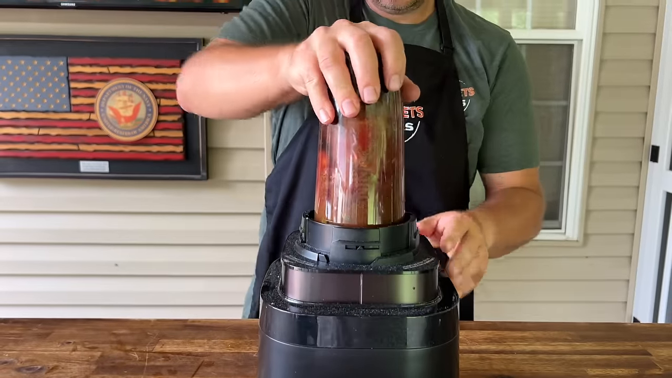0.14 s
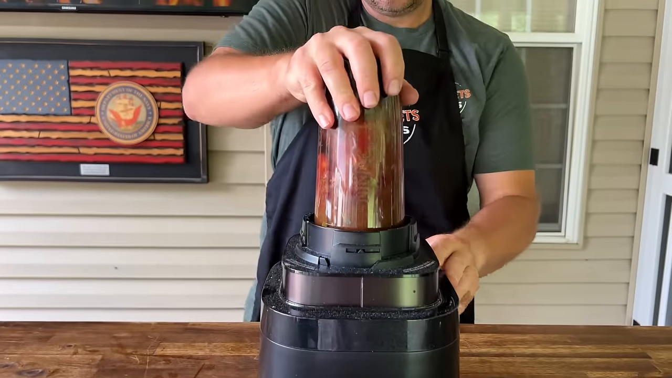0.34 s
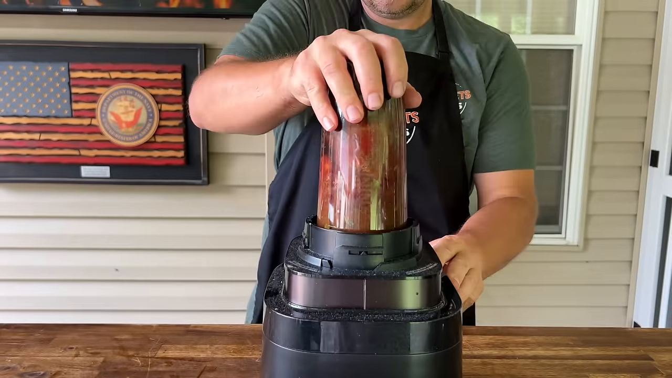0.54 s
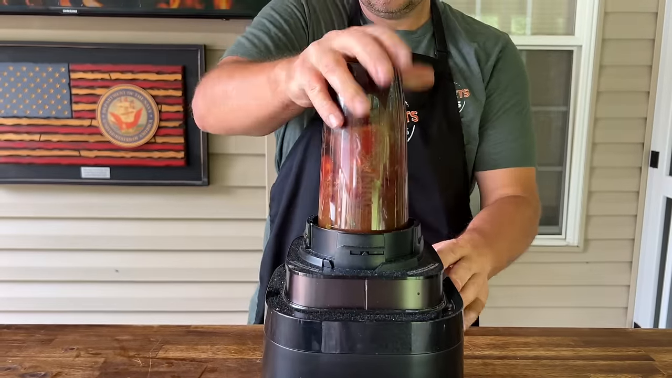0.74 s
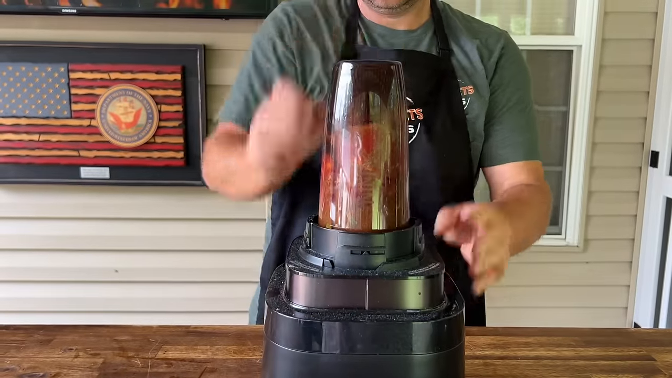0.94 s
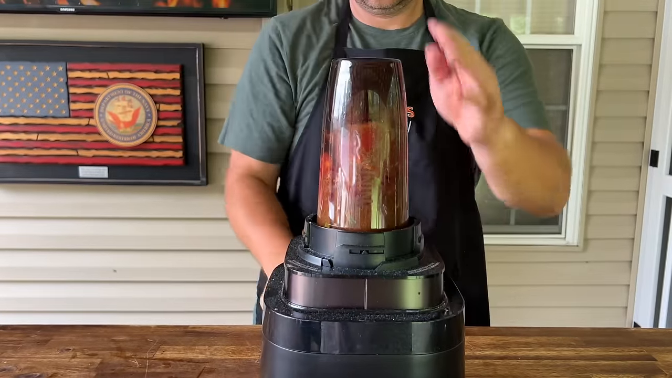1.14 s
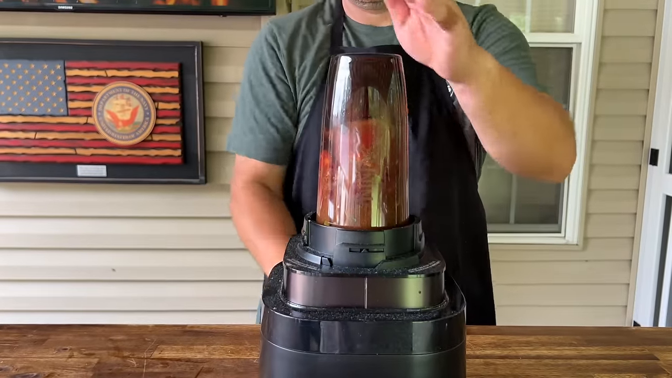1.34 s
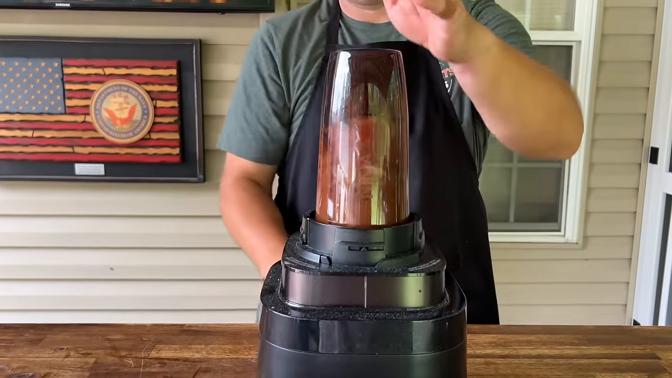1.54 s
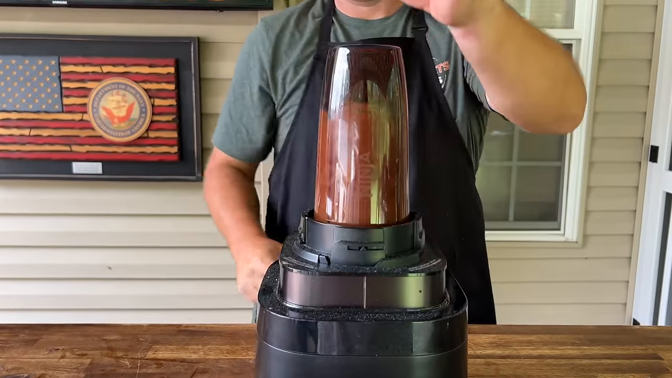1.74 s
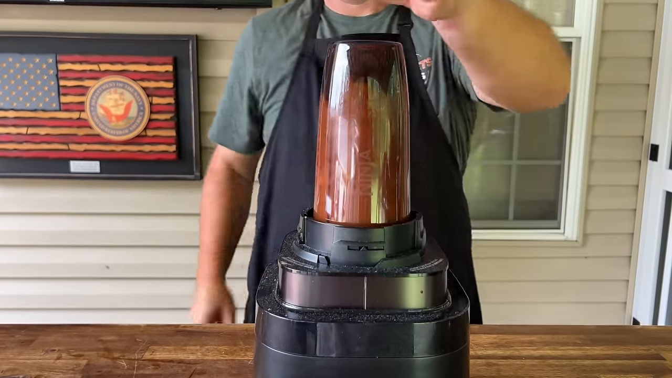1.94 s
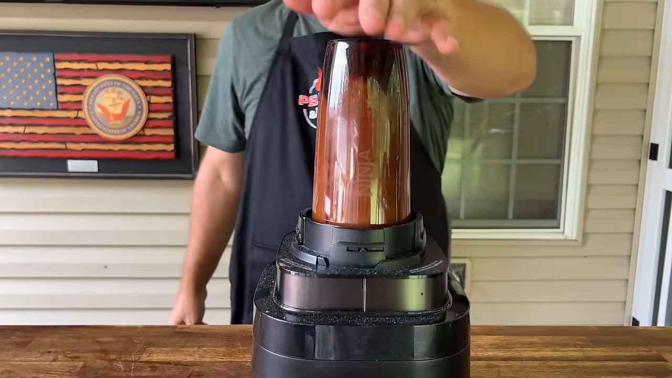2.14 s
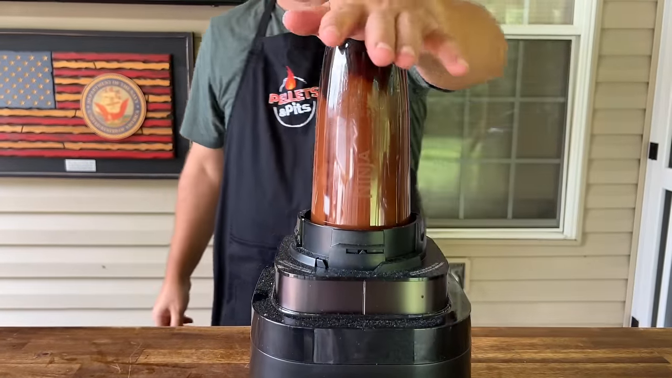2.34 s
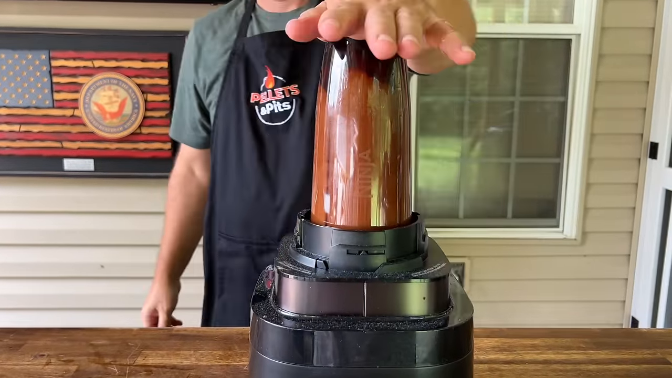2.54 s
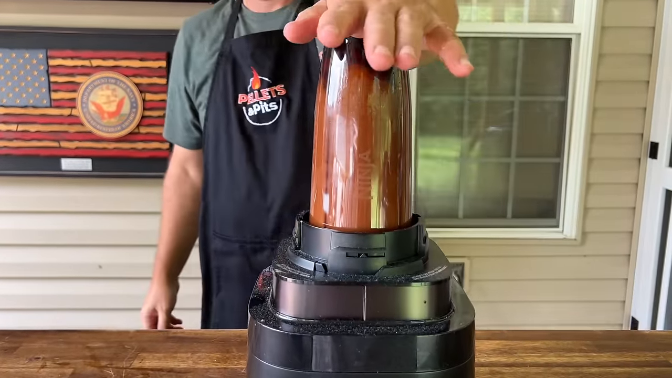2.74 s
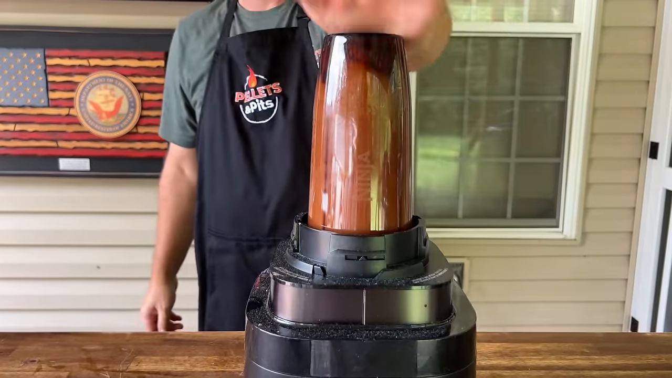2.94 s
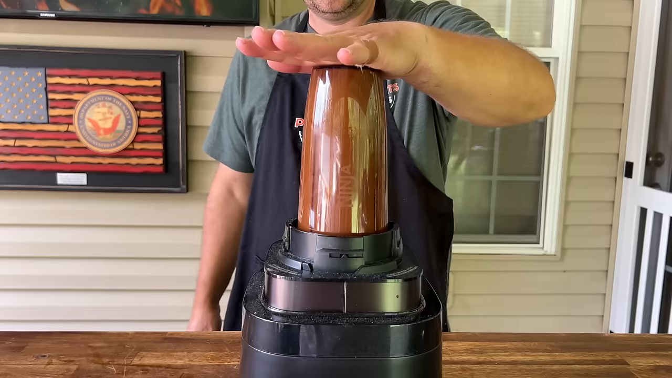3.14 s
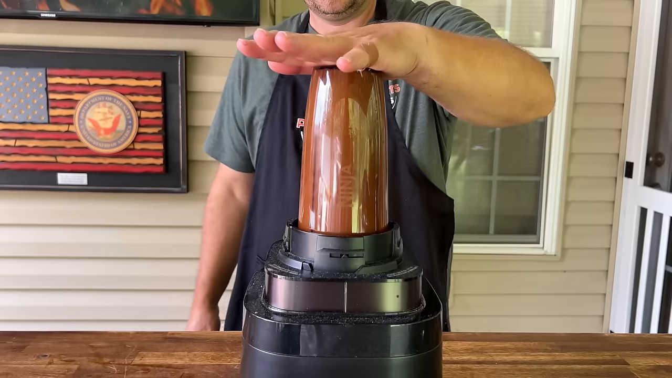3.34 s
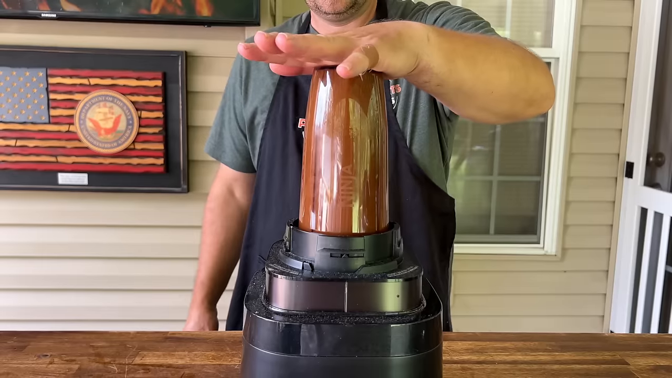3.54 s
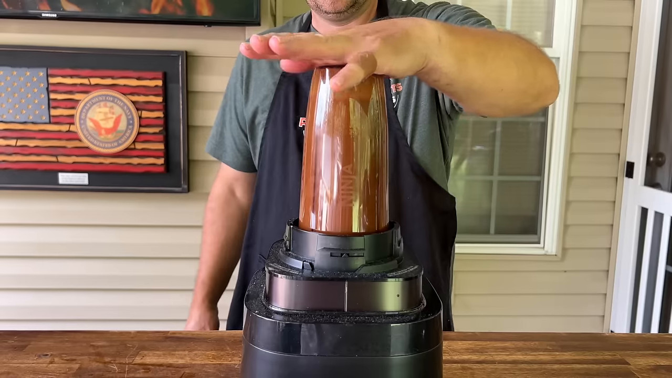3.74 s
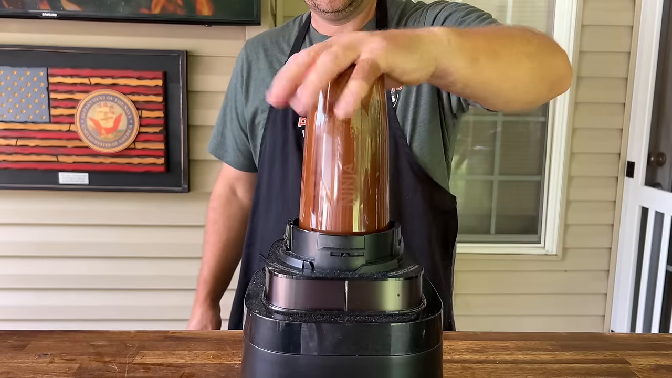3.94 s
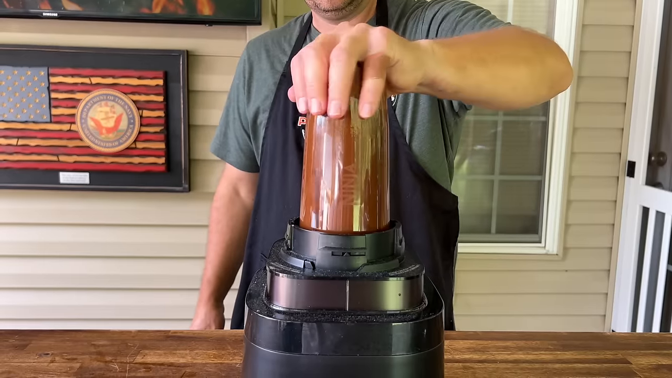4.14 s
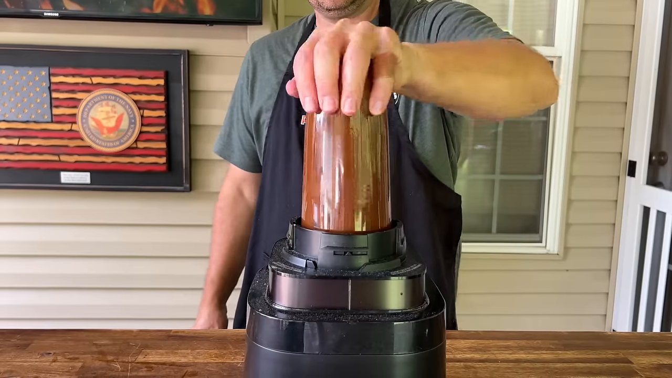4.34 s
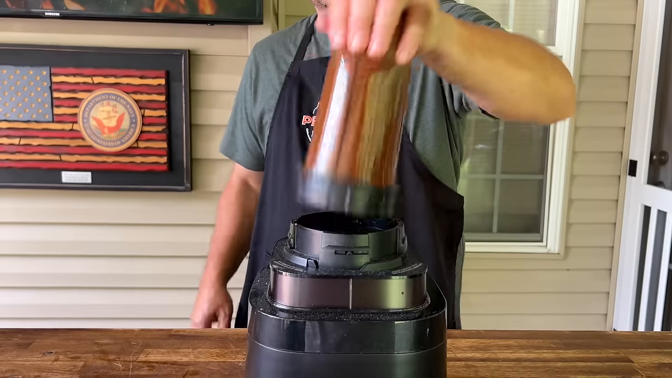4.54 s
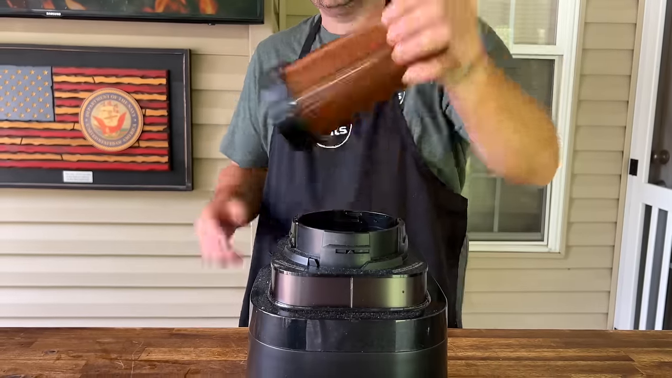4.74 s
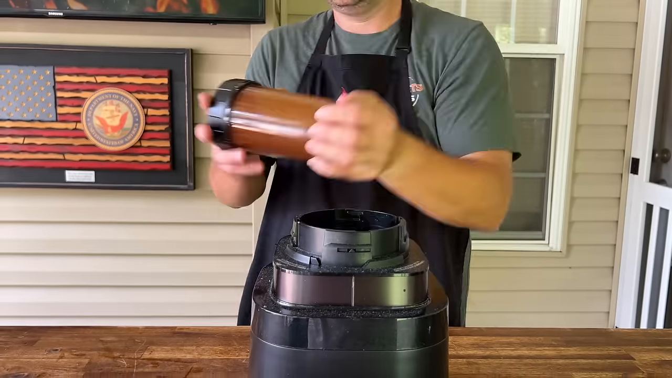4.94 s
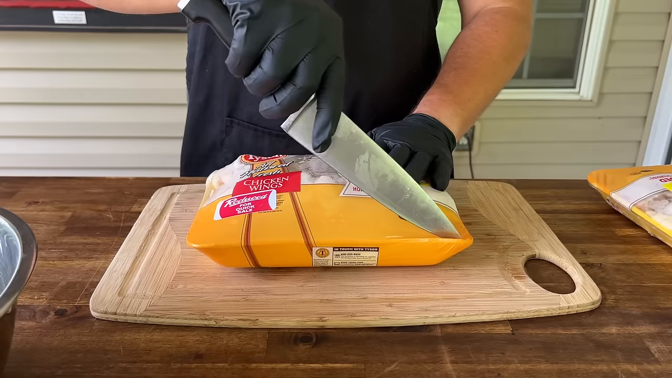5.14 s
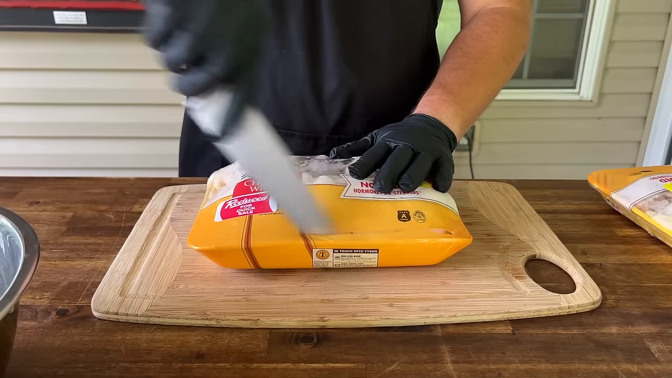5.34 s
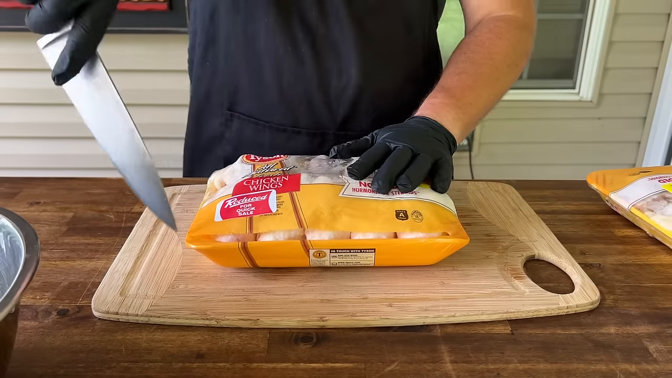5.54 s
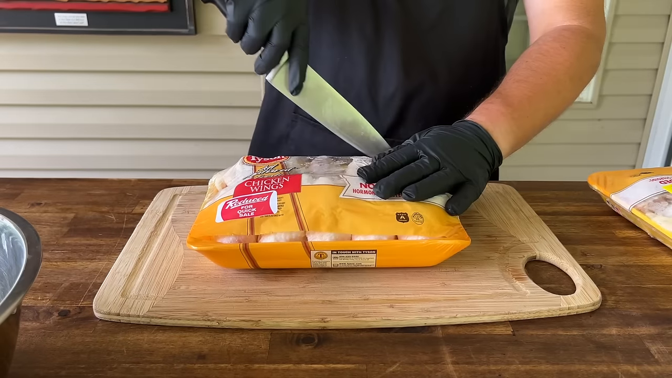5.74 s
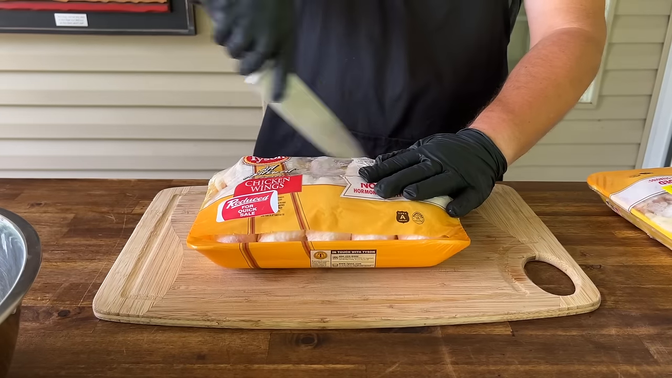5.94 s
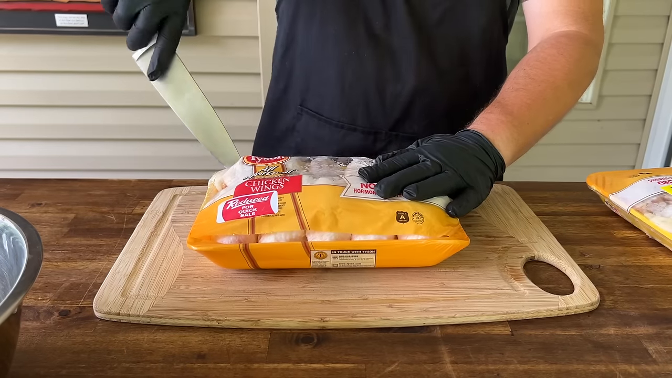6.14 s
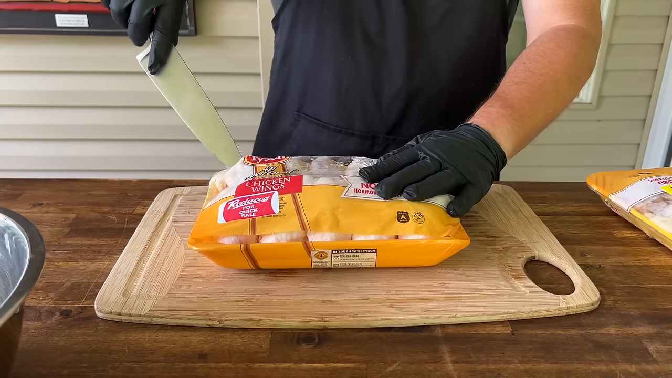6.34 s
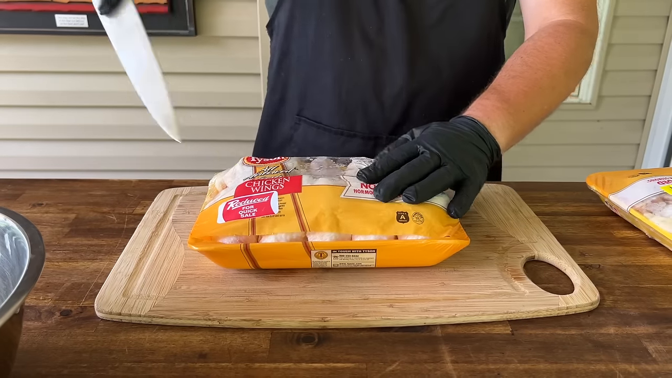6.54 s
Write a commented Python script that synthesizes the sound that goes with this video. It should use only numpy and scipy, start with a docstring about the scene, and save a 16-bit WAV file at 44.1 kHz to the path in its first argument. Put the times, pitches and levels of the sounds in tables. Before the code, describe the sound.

On a breezy porch, a blender whirs briefly, its cup clacks free, and a knife punctures and slits plastic wrap.

```python
"""On a breezy porch, a blender cup is locked onto its base, each impact exciting damped modes.
The motor labours in thick sauce, winds up, hums through rotating imbalance, cuts out and coasts;
shaft speed governs its whirr, rattle and churning. The cup is twisted free, then a knife punctures
and slits the film of a meat tray, releasing its tension in snaps and rips. The porch returns a short
echo, wind buffets the microphone and insects hiss far off."""
import sys
import numpy as np
from scipy import signal
from scipy.fft import rfft, irfft
from scipy.io import wavfile
from scipy.ndimage import uniform_filter1d

SR = 44100
rng = np.random.default_rng(int(sys.argv[2]) if len(sys.argv) > 2 else 0)


def put_to_file(sound):
    """Save the sound as 16-bit audio at rate SR, in the file named by the first command-line argument."""
    columns = np.atleast_2d(sound).T  # one column per channel
    safe = np.clip(columns, -1, 1)
    whole_steps = np.round(safe * 32767)
    wavfile.write(sys.argv[1], SR, whole_steps.astype(np.int16))


N = 291060
T = np.arange(N) / SR
# power on, sauce breaks loose, lumps are chopped, top speed, power off
ON_S, LOOSE_S, SMOOTH_S, TOP_S, OFF_S = 1.375, 1.6, 2.34, 2.56, 3.075
LABOUR_HZ, FULL_HZ, KICK_S = 65.9, 200.5, .03  # shaft rate in packed sauce, top rate, start-up time

# churning sauce: frequency_hz, gain_db
CHURN_SPECTRUM = [(60, -20.5), (140, -8.5), (240, -8), (450, 1.5), (700, 0), (1400, -7), (2200, -4.5),
                  (2750, -6), (3700, -4), (4900, -10.5), (6000, -15.5), (8500, -21.5), (10000, -32),
                  (15500, -54)]
# resonances of the filled cup: centre_hz, width_hz, gain_db
CUP_RESONANCES = [(238, 40, 7.5), (585, 25, -5.5), (623, 28, 5), (800, 58, 4), (1064, 25, 6.5),
                  (1246, 94, 7), (1410, 100, 5.5), (1778, 240, 6.5), (2070, 210, 4), (2360, 79, 4.5),
                  (3200, 200, 1), (4160, 200, 4), (8300, 880, 4.5)]
# cavitation, lumpy swirl and smooth swirl: frequency_hz, gain_db
FIZZ_SPECTRUM = [(3000, -19), (6500, .5), (10000, -2.5), (15500, -4.5)]
LUMPY_SPECTRUM = [(60, -12), (230, 2.5), (450, -5.5), (800, -6.5), (1500, -23.5), (5000, -38.5)]
SMOOTH_SPECTRUM = [(60, -33), (230, 4), (450, -10.5), (1200, -3.5), (2000, -18), (5000, -56)]
# cup resonances under swirling sauce: centre_hz, width_hz, gain_db
LUMPY_RESONANCES = [(255, 90, 5.6), (700, 230, 7.8)]
SMOOTH_RESONANCES = [(645, 90, 9.4), (1145, 220, 9.4)]
# hum of the unbalanced blade, one row per shaft order: start_s, fade_start_s, full_speed_level_db
HUM_ORDERS = [(2.2, 2.85, -16.3), (2.41, 3.06, -21.5), (2.42, 2.88, -22.3)]
# rotor and bearings: frequency_hz, gain_db
WHIRR_SPECTRUM = [(100, -24.5), (230, 1), (450, -7.5), (800, 1), (1400, -5), (2200, -5), (2750, -10.5),
                  (3700, -12), (4800, -14), (6000, -23), (8500, -29.5), (10000, -36), (15500, -42)]
# resonances of the motor housing: centre_hz, width_hz, gain_db
HOUSING_RESONANCES = [(1810, 130, 4), (2100, 73, 3), (3160, 110, 6), (3384, 181.5, 7.5), (3950, 80, 3),
                      (4400, 118, 4.5), (4690, 260, 9), (5440, 120, 7), (7860, 280, 9), (8760, 490, 5)]
# loose drive coupling: frequency_hz, gain_db
RATTLE_SPECTRUM = [(200, -6.5), (1200, 1), (2000, 2.5), (2700, -1.5), (3600, 7), (4800, -8.5),
                   (6000, -14.5), (8700, -25), (11000, -29)]
# sauce lumps strike the blade: start_s, level_db
LUMP_STRIKES = [(1.416, -29), (1.460, -27), (1.817, -16.5)]
# brush friction: frequency_hz, gain_db
BRUSH_SPECTRUM = [(1500, -16), (3300, 3.5), (5000, -6), (6500, -10.5), (9000, -17.5), (11000, -44.5)]
# housing resonances excited by the brushes: centre_hz, width_hz, gain_db
BRUSH_RESONANCES = [(3450, 220, 17), (4800, 200, 12), (8800, 340, 14)]

# impacts of cup, latch and switch: start_s, clack_db, body_db, tick_db
IMPACTS = [(.006, -21.5, -19, -18), (.057, -11, -6, -8), (.398, -34, -44, -50), (.598, -37.5, -44, -62),
           (1.21, -26.5, -21, -45), (1.317, -33, -23.5, -65), (1.373, -35, -35, -41), (4.08, -44, -43, -53),
           (4.11, -14, -24.5, -9.5), (4.124, -24, -22, -20), (4.171, -22, -18, -39),
           (4.186, -33, -25.5, -53), (4.417, -45.5, -33, -61), (4.445, -42, -42, -46),
           (4.465, -39, -39, -39)]
# modes of the base and cup: pitch_hz, level_db, t60_s
BODY_MODES = [(239, 1, 0.07), (295, -0.5, 0.042), (353, 2, 0.054), (480, -4, .05), (551, -8.5, 0.11),
              (640, -9, 0.07), (782, -7.5, 0.044), (1039, -16, 0.061), (1630, -22, 0.086)]
# hollow clack of plastic: frequency_hz, gain_db
CLACK_SPECTRUM = [(150, 8.5), (500, 4), (1600, 0.5), (3300, -2.5), (5000, -12.5), (9000, -48), (16000, -62)]
# bright contact tick: frequency_hz, gain_db
TICK_SPECTRUM = [(1000, -22), (3000, -12), (4500, -7), (8500, -9.5), (11000, -16), (16000, -15)]
# resonances of struck plastic: centre_hz, width_hz, gain_db
CLACK_RESONANCES = [(1510, 690, 5), (2780, 500, 1)]
TICK_RESONANCES = [(4660, 900, 4), (11700, 2000, 2.6)]

# the film snaps under the knife: start_s, level_db, pitch_hz, t60_s
FILM_SNAPS = [(5.228, -2, 4400, 0.013), (5.239, -12, 4000, 0.013), (5.316, -18, 4500, 0.0068),
              (5.887, -10.5, 2550, 0.014), (5.891, -10.5, 2800, 0.012), (5.9, -37, 6900, 0.032),
              (6.044, -26, 8000, .008), (6.150, -39, 6000, 0.014), (6.215, -13, 4340, 0.0096)]
# the knife tears through the film: start_s, end_s, level_db
FILM_TEARS = [(5.203, 5.224, -42.5), (5.234, 5.409, -34), (5.247, 5.258, -22.5), (5.299, 5.312, -24),
              (5.332, 5.347, -24.5), (5.346, 5.367, -20), (5.394, 5.399, -24), (5.406, 5.482, -42),
              (5.897, 5.915, -25)]
# the knife slides along the film: start_s, end_s, level_db
KNIFE_STROKES = [(5.888, 6.03, -26.5), (6.32, 6.37, -42.5)]
# snapping, tearing and slitting film: frequency_hz, gain_db
SNAP_SPECTRUM = [(200, -.5), (700, 2), (1100, -4.5), (1700, 2.5), (2800, .5), (5000, -5), (16000, 0)]
TEAR_SPECTRUM = [(150, -7.5), (250, -6.5), (318, -6), (372, -2), (624, -10), (867, -7), (1380, -4.5),
                 (1820, -1), (1990, -3), (3960, -3), (15500, -15.5)]
SLIT_SPECTRUM = [(300, -23), (800, -13.5), (1250, -8), (1650, -0.5), (3000, -3.5), (4000, 0.5), (5500, -5),
                 (7000, -7), (10000, -8), (15500, -11)]

# long and short parts of the porch echo: frequency_hz, gain_db
LONG_ECHO_SPECTRUM = [(100, -1), (600, -5), (4000, .5), (8000, -5), (14000, -20.5)]
SHORT_ECHO_SPECTRUM = [(2000, -16), (7000, -1), (16000, 1.5)]
# gusts strike the microphone: start_s, end_s, level_db
WIND_GUSTS = [(.43, .63, -23), (.94, 1.33, -20), (1.58, 1.66, -21.5), (1.83, 1.98, -23.5),
              (2.33, 2.66, -28.5), (2.92, 3.08, -26), (3.65, 3.93, -36), (4.52, 4.78, -30.5),
              (5.56, 5.73, -24.5), (6.12, 6.6, -35.5)]
# deep rumble and buffeting of the wind: frequency_hz, gain_db
RUMBLE_SPECTRUM = [(1, -31), (5, 1.5), (9, 1), (14, 9), (25, -4), (40, -18.5), (70, -25.5), (120, -48),
                   (400, -103)]
BUFFET_SPECTRUM = [(10, -19), (30, 11), (45, -0.5), (70, -1), (120, -16.5), (200, -25.5), (400, -55),
                   (1000, -86.5)]
# dull pops in the rumble: start_s, level_db
RUMBLE_POPS = [(5.0132, -25), (5.781, -13.5)]
# garden air and distant insects: frequency_hz, gain_db
AIR_SPECTRUM = [(100, 4.5), (250, 1), (420, 2), (550, -4), (800, -2.5), (1100, -10.5), (2000, -15),
                (3000, -17.5), (7000, -28), (10000, -32.5), (15500, -36)]
INSECT_SPECTRUM = [(2800, -21), (4000, 1.5), (4700, 0), (5400, 1.5), (6500, -9.5), (7600, -2),
                   (8600, -14.5), (10000, -43.5)]
# nearer insects join in: start_s, end_s, level_db
INSECT_SWELLS = [(.55, 1.05, -64), (4.45, 5.1, -75)]


def blender(cut_s=.0014, smoothing_s=.15):
    """Rotating machinery: one shaft paces every source, under a load that falls as lumps are chopped."""
    speed_hz = shaft()
    pace = speed_hz / FULL_HZ
    turns = np.cumsum(speed_hz) / SR
    power = held(ON_S, OFF_S, KICK_S, cut_s)
    lumps = 1 / (1 + np.exp((T - SMOOTH_S) / smoothing_s))
    return (brushes(pace, turns, power) + sauce(pace, turns, power) + swirl(pace, lumps, power)
            + hum(pace, turns) + motor(pace, turns, lumps))


def shaft(windup_exponent=1.42, sag_hz_per_s=11, drag_s=.68, friction_hz=73.7):
    """Rotation rate rises as the load yields; unpowered, viscous drag and dry friction stop it."""
    shortfall = (1 - ramp(LOOSE_S, TOP_S - LOOSE_S)) ** windup_exponent
    sag_hz = sag_hz_per_s * (np.clip(T, TOP_S, OFF_S) - TOP_S)
    driven_hz = (FULL_HZ - (FULL_HZ - LABOUR_HZ) * shortfall - sag_hz) * ramp(ON_S, KICK_S)
    drag = np.exp(-np.maximum(T - OFF_S, 0) / drag_s)
    speed_hz = np.maximum((driven_hz + friction_hz) * drag - friction_hz, 0)
    return speed_hz * (1 + .002 * wander(25))


def sauce(pace, turns, power, churn_db=-12.5, aeration_db_per_s=2, wake_db=-13, fizz_db=-20):
    """Blade passage modulates the churning and leaves a periodic wake; cavitation adds fizz at speed."""
    blade_passage = 1 + .25 * np.cos(2 * np.pi * 2 * turns)  # two tips
    level = amp(churn_db + aeration_db_per_s * (T - TOP_S) + .46 * wander(21))
    stir = level * pace ** 2.18 * ramp(LOOSE_S, .15) * power * blade_passage
    wake = unit(sum(amp(3 * wander(9)) / order * np.sin(2 * np.pi * (order * turns + rng.random()))
                    for order in range(4, 14)))
    slapping = noise() + amp(-9) * grains(500, 3.43)
    churn = colour(stir * slapping, CHURN_SPECTRUM, CUP_RESONANCES)
    fizz = colour(stir * noise() * pace ** 2.2, FIZZ_SPECTRUM)
    return churn + amp(wake_db) * stir * wake + amp(fizz_db) * fizz


def hum(pace, turns, speed_exponent=5.2, waver_db=.4):
    """Rotating imbalance forces the base at the first shaft orders, easing as the sauce evens out."""
    vibration = np.zeros(N)
    for order, (start, end, db) in enumerate(HUM_ORDERS, 1):
        level = amp(db + waver_db * wander(9.9)) * held(start, end, attack_s=.049, release_s=.2)
        vibration += level * np.sqrt(2) * np.sin(2 * np.pi * order * turns)
    return vibration * pace ** speed_exponent * held(ON_S, OFF_S, KICK_S, release_s=.009)


def motor(pace, turns, lumps, whirr_db=-24, load_db=4.5, rattle_db=-30, scatter_db=2.5):
    """Bearing noise and one knock of the loose coupling per turn excite the housing's resonances."""
    pulsing = 1 + .15 * np.cos(2 * np.pi * turns)
    whirr = amp(whirr_db + load_db * lumps) * pace ** 1.81 * noise() * pulsing
    turn_starts = np.flatnonzero(np.diff(np.floor(turns)))
    strength, lateness = rng.standard_normal((len(turn_starts), 2)).T
    knock_s = T[turn_starts] + .1 * lateness / (FULL_HZ * pace[turn_starts])
    knock_db = rattle_db + scatter_db * strength + 20 * np.log10(pace[turn_starts])
    knocks = np.zeros(N)
    for start, db in [*LUMP_STRIKES, *zip(knock_s, knock_db)]:
        add(knocks, start, amp(db) * burst(t60_s=.021, size=2048))
    rattle = colour(knocks, RATTLE_SPECTRUM, HOUSING_RESONANCES)
    return colour(whirr, WHIRR_SPECTRUM, HOUSING_RESONANCES) + rattle


def brushes(pace, turns, power, rub_db=-27, onset_pace=.62, onset_width=.019):
    """Above a threshold speed, brush friction on the commutator excites narrow housing resonances."""
    grip = power / (1 + np.exp((onset_pace - pace) / onset_width))
    chatter = 1 + .83 * np.cos(2 * np.pi * turns)
    rub = grip * chatter * noise() * amp(rub_db + 1.5 * wander(40))
    return colour(rub, BRUSH_SPECTRUM, BRUSH_RESONANCES)


def swirl(pace, lumps, power, driven_db=-36, lumps_db=14, coast_db=-35, settle_pace=.38):
    """Unsteady flow excites the cup: lumpy sauce gurgles low, smooth coasting sauce rings higher."""
    flow = unit(noise() + grains(300, 1.9)) * amp(2.3 * wander(27))
    driven = amp(driven_db + lumps_db * lumps) * pace ** 1.11 * power
    coasting = amp(coast_db) * np.tanh(pace / settle_pace) ** 2 * (T >= OFF_S)
    gurgle = colour(flow * driven, LUMPY_SPECTRUM, LUMPY_RESONANCES)
    return gurgle + colour(flow * coasting, SMOOTH_SPECTRUM, SMOOTH_RESONANCES)


def plastic_impacts(clack_rise_s=.0016, body_rise_s=.0056):
    """Impact excitation: a contact tick, a hollow clack, then the damped modes of the heavy base."""
    clack, tick, body = np.zeros((3, N))
    t = T[:SR // 2]
    clack_rise = 1 - np.exp(-t / clack_rise_s)
    body_rise = 1 - np.exp(-(t / body_rise_s) ** 2)
    for start, clack_db, body_db, tick_db in IMPACTS:
        add(clack, start, amp(clack_db) * burst(t60_s=.042) * clack_rise)
        add(tick, start, amp(tick_db) * burst(t60_s=.018))
        for hz, db, t60_s in BODY_MODES:
            detune = 1 + .008 * rng.standard_normal()
            mode = np.sin(2 * np.pi * (hz * detune * t + rng.random()))
            add(body, start, amp(body_db + db) * body_rise * decay(t60_s) * mode)
    clack = colour(clack, CLACK_SPECTRUM, CLACK_RESONANCES)
    return clack + colour(tick, TICK_SPECTRUM, TICK_RESONANCES) + body


def knife(ring_q=2.66):
    """Sudden release of tension makes the film snap and rip; friction along the edge makes it hiss."""
    snaps = np.zeros(N)
    for start, db, hz, t60_s in FILM_SNAPS:
        crack = burst(t60_s)
        ring = signal.lfilter(*signal.iirpeak(hz, ring_q, fs=SR), crack)
        add(snaps, start, amp(db) * (.397 * crack + 2.506 * ring))
    pull = sum(amp(db) * (T > start) * (T < end) for start, end, db in FILM_TEARS)
    rips = uniform_filter1d(pull, size=130) * unit(noise() + grains(2500, 2.6))
    strokes = swells(KNIFE_STROKES, attack_s=.075, release_s=.016)
    hiss = strokes * unit(noise() + grains(2500, 2.4)) * amp(1.5 * wander(83))
    return colour(snaps, SNAP_SPECTRUM) + colour(rips, TEAR_SPECTRUM) + colour(hiss, SLIT_SPECTRUM)


def porch(direct, wet_db=-14, delay_s=.006):
    """Reflections from siding, floor and roof form a short reverberation whose treble dies first."""
    long_tail, short_tail = np.zeros((2, N))
    add(long_tail, delay_s, burst(t60_s=.22))
    add(short_tail, delay_s, burst(t60_s=.18))
    echo = colour(long_tail, LONG_ECHO_SPECTRUM) + 1.3 * colour(short_tail, SHORT_ECHO_SPECTRUM)
    echo = echo[:SR // 2]
    return direct + amp(wet_db) * signal.fftconvolve(direct, echo / np.linalg.norm(echo))[:N]


def wind(breeze_db=-42, rumble_db=-22, flutter_db=2.5):
    """Turbulent pressure buffets the microphone; a deep rumble grows as the square root of its force."""
    gusts = swells(WIND_GUSTS, attack_s=.056, release_s=.09)
    force = (amp(breeze_db) + gusts) * amp(flutter_db * wander(9))
    rumble = unit(colour(noise(), RUMBLE_SPECTRUM)) * amp(rumble_db) * np.sqrt(force / amp(breeze_db))
    return rumble + unit(colour(noise(), BUFFET_SPECTRUM)) * force


def pops():
    """A decaying step has mostly low-frequency energy, so a jump in the rumble is heard as a dull pop."""
    steps = np.zeros(N)
    for start, db in RUMBLE_POPS:
        add(steps, start, amp(db) * decay(t60_s=.09))
    return steps


def garden(air_db=-51, chorus_db=-65.5, chirp_db=-59, chirp_hz=2050):
    """Incoherent insect calls merge into a high hiss over soft air noise and one faint tonal chirp."""
    air = colour(noise(), AIR_SPECTRUM) * amp(air_db + .84 * wander(3.3))
    chorus = amp(chorus_db) + swells(INSECT_SWELLS, attack_s=.23, release_s=.2)
    insects = colour(noise(), INSECT_SPECTRUM) * chorus * amp(1.1 * wander(30))
    chirp = held(.82, .854, attack_s=.03, release_s=.02) * np.sin(2 * np.pi * chirp_hz * T)
    return air + insects + amp(chirp_db) * chirp


def amp(db):
    """Amplitude ratio of a level in decibels."""
    return 10 ** (np.asarray(db) / 20)


def ramp(start_s, rise_s):
    """Linear rise from 0 to a steady 1."""
    return np.clip((T - start_s) / rise_s, 0, 1)


def held(start_s, end_s, attack_s, release_s):
    """Envelope with linear attack, hold and exponential release."""
    return ramp(start_s, attack_s) * np.exp(-np.maximum(T - end_s, 0) / release_s)


def swells(rows, attack_s, release_s):
    """Superposition of held envelopes."""
    return sum(amp(db) * held(start, end, attack_s, release_s) for start, end, db in rows)


def unit(x):
    """Normalisation to rms 1."""
    return x / np.sqrt(np.mean(x ** 2))


def noise():
    """Gaussian white noise."""
    return rng.standard_normal(N)


def wander(cutoff_hz):
    """Low-pass noise: a smooth fluctuation of rms 1."""
    return unit(signal.sosfilt(signal.butter(2, cutoff_hz, fs=SR, output="sos"), noise()))


def grains(rate_per_s, spread_db):
    """Shot noise: random impulses of uneven size, rms 1."""
    impulses = (rng.random(N) < rate_per_s / SR) * np.sign(noise())
    return unit(impulses * amp(spread_db * rng.uniform(-2, 2, N)))


def colour(x, spectrum, resonances=(), taps=16384):
    """Minimum-phase filter from a spectrum and resonances; white noise keeps its power."""
    freqs = np.maximum(np.fft.rfftfreq(2 * taps, 1 / SR), 1)
    hz, db = np.transpose(spectrum)
    gain_db = np.interp(np.log(freqs), np.log(hz), db)
    for centre_hz, width_hz, lift_db in resonances:
        gain_db += lift_db / (1 + (2 * (freqs - centre_hz) / width_hz) ** 2)
    cepstrum = irfft(np.log(unit(amp(gain_db))))
    cepstrum[1:taps] *= 2  # folding onto positive time makes the filter causal
    cepstrum[taps + 1:] = 0
    response = irfft(np.exp(rfft(cepstrum)))[:taps]
    return signal.fftconvolve(x, response)[:N]


def decay(t60_s, size=SR // 2):
    """Exponential damping by 60 dB in t60_s."""
    return np.exp(-np.log(1000) * T[:size] / t60_s)


def burst(t60_s, size=SR // 2):
    """Exponentially damped noise."""
    return decay(t60_s, size) * rng.standard_normal(size)


def add(track, start_s, sound):
    """Superposition of a delayed sound on a track."""
    i = max(int(start_s * SR), 0)
    track[i:i + len(sound)] += sound[:N - i]


def scene():
    """Sound pressures add at one microphone on the counter; the near sources excite the porch echo."""
    background = wind() + garden() + pops()
    return (background + porch(plastic_impacts() + knife() + blender()))[None]


def record(dry, cutoff_hz=15850):
    """Clipping holds peaks to full scale; a steep low-pass then limits the bandwidth."""
    lowpass = signal.ellip(10, .2, 70, cutoff_hz, fs=SR, output="sos")
    return signal.sosfilt(lowpass, np.clip(dry, -1, 1))


dry = scene()
out = record(dry)
put_to_file(out)
```